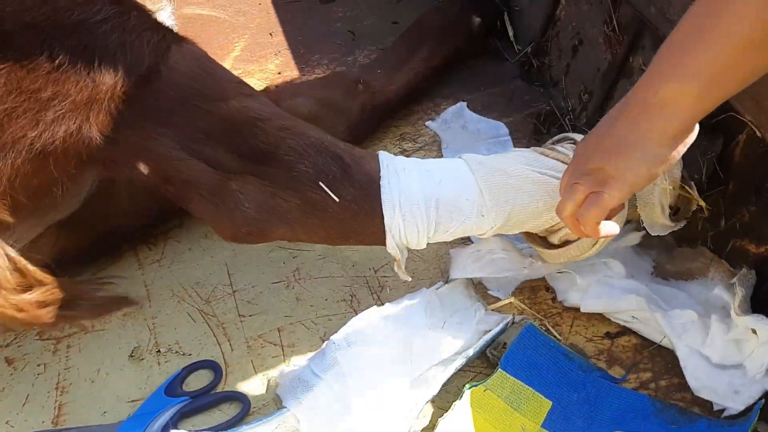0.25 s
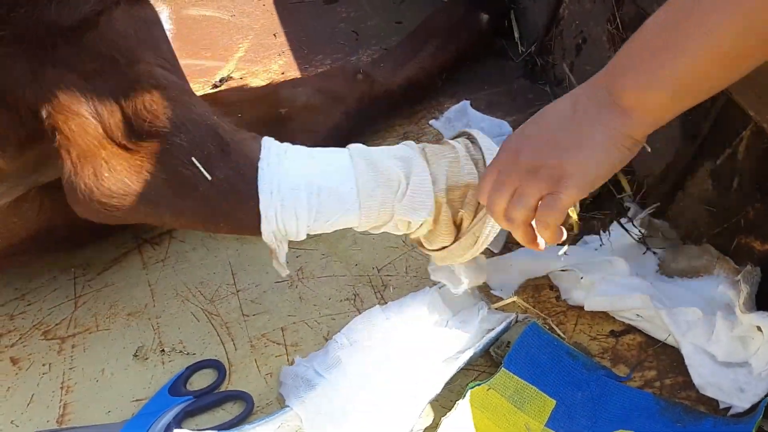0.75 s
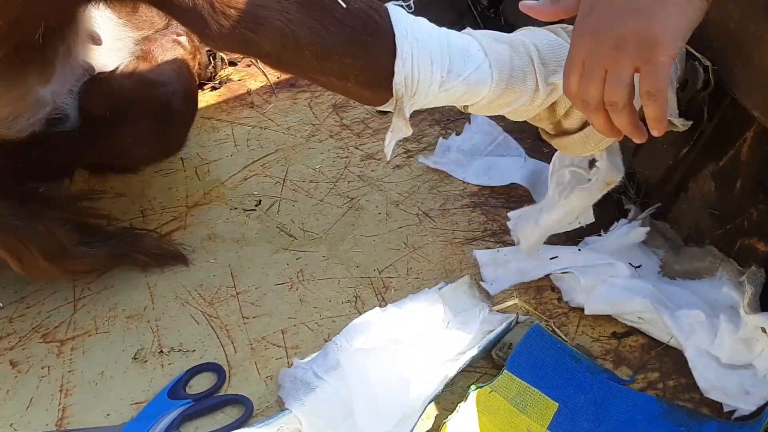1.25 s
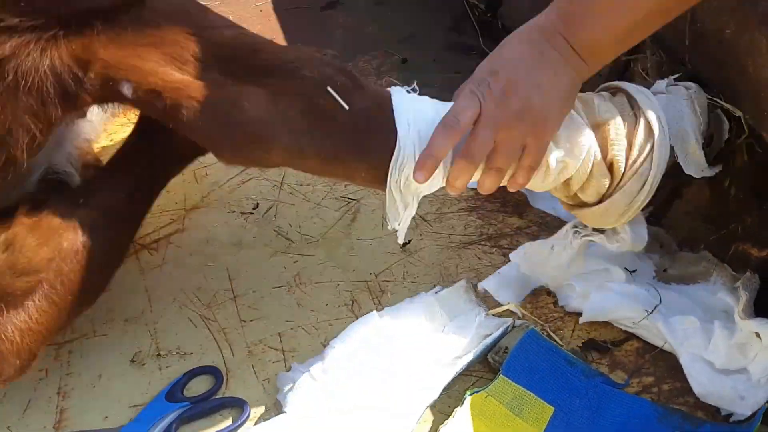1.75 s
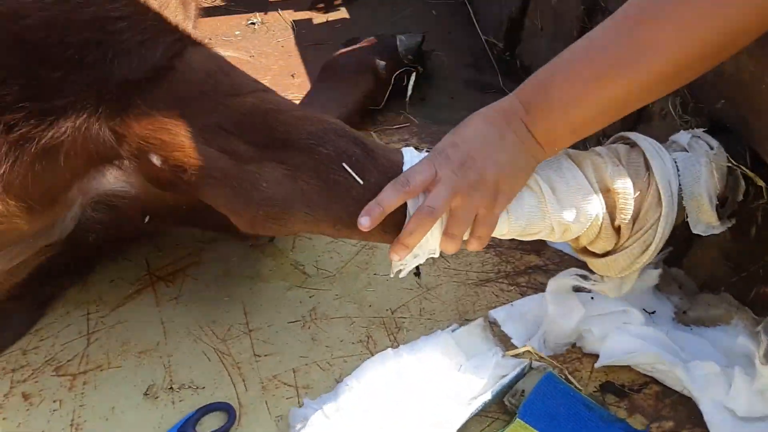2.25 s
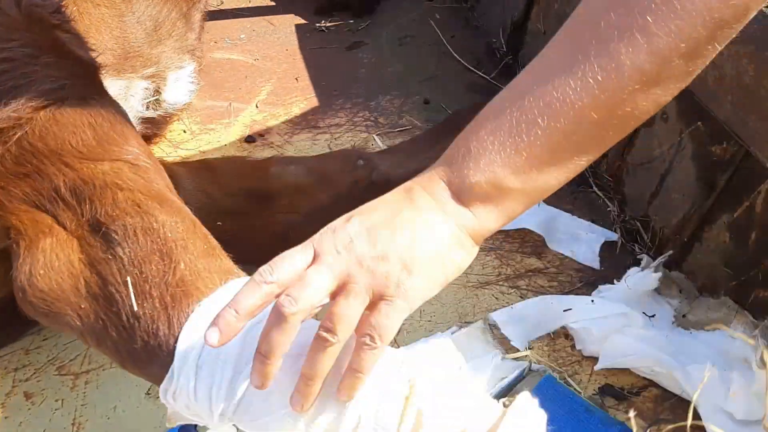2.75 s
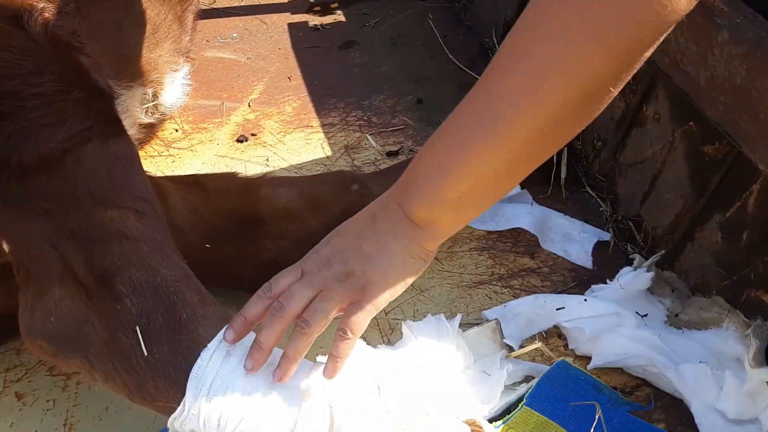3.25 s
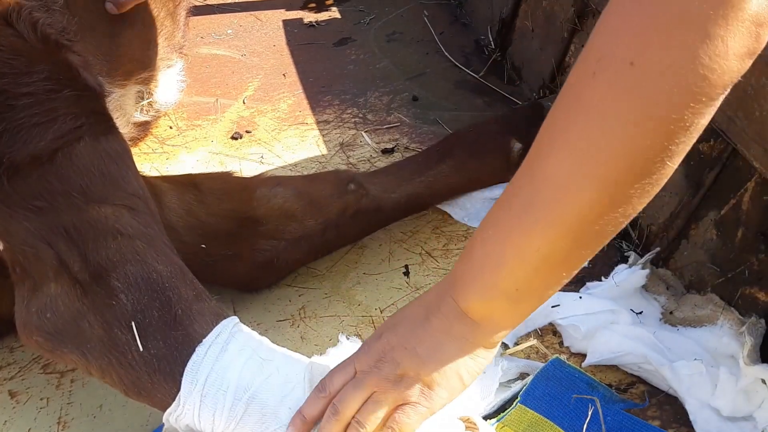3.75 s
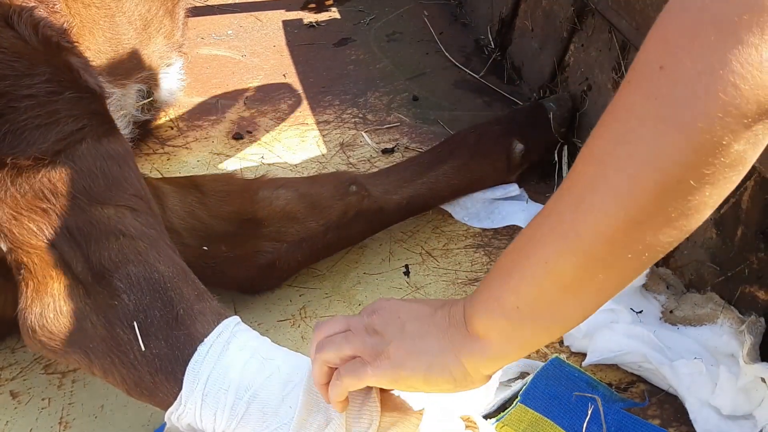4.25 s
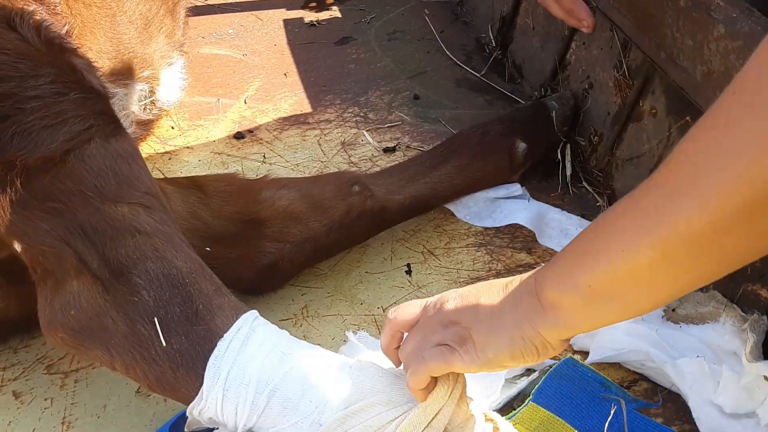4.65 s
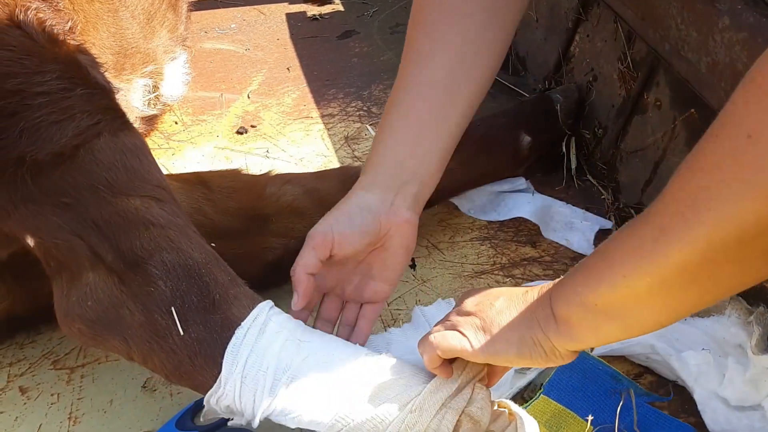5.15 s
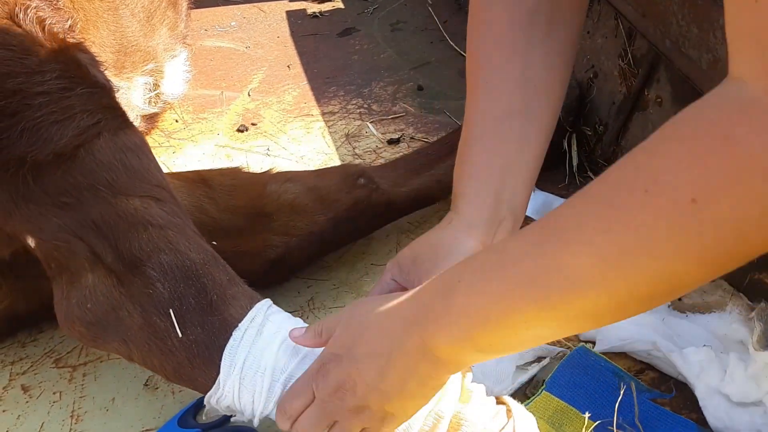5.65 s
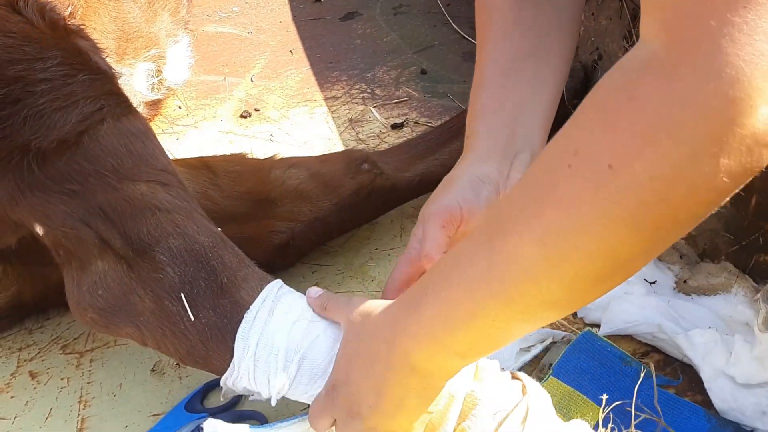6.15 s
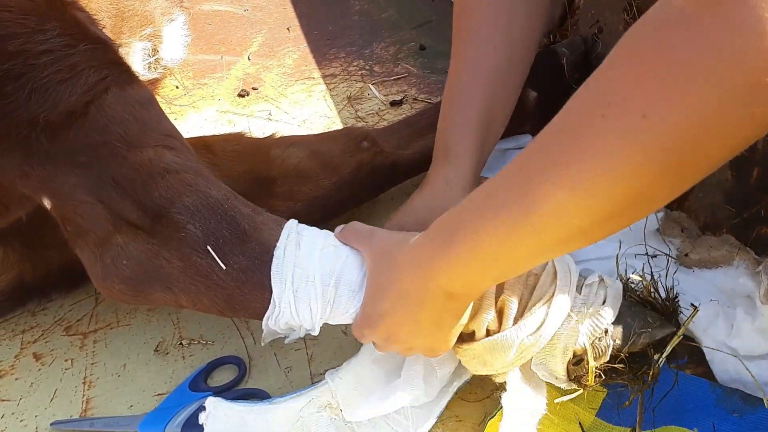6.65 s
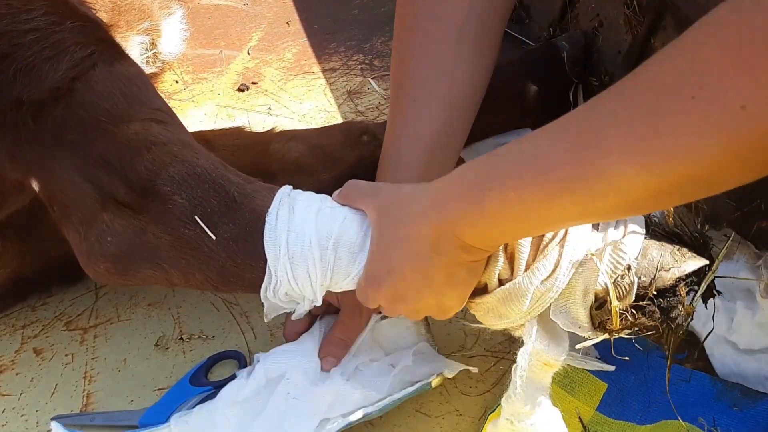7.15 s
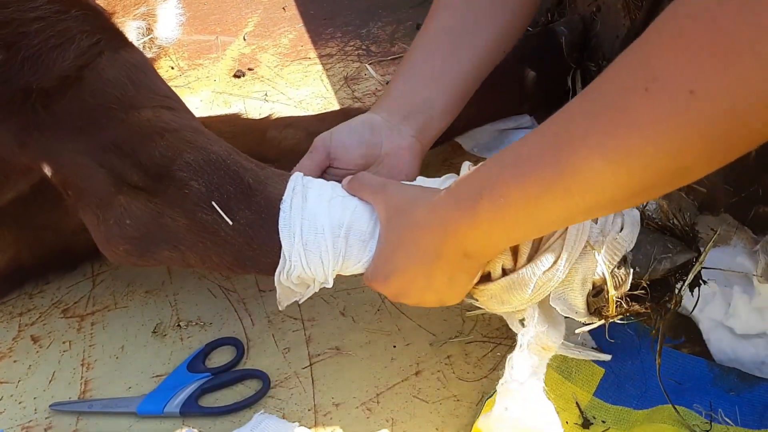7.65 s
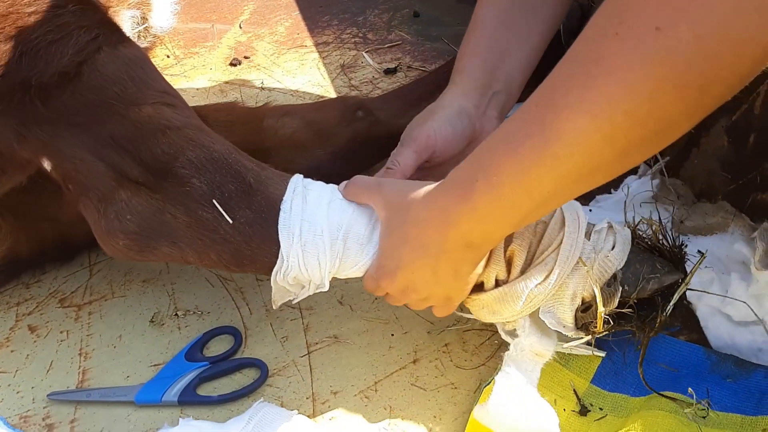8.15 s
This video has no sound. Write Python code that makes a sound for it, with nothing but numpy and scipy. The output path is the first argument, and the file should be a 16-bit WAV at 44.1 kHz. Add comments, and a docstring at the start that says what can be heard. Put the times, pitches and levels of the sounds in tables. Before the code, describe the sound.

A calf's hooves boom, clatter and scrape on a trailer floor, then faint bandage rustling, one more gritty scrape and a knock.

```python
"""Calf struggling in a trailer

A calf lies on the floor of a small trailer and kicks while its leg is bandaged. Hooves boom on the
bed, set the loose sides clattering and leave the frame humming; legs and body drag over the gritty
floor. In the lull, gauze and straw rustle over a faint hiss; then one more long scrape and a knock."""
import sys
import numpy as np
from scipy import signal
from scipy.fft import rfft, irfft, next_fast_len
from scipy.io import wavfile
from scipy.ndimage import uniform_filter1d

SR = 44100
rng = np.random.default_rng(int(sys.argv[2]) if len(sys.argv) > 2 else 0)


def output_pcm(signal):
    """Save a mono or channel-first signal as 16-bit PCM at the path in sys.argv[1].

    Samples are clipped to [-1, 1] before scaling.
    """
    pcm = np.clip(np.atleast_2d(signal).T, -1, 1) * 32767
    wavfile.write(sys.argv[1], SR, np.round(pcm).astype(np.int16))


N = 370881

# Hoof and leg blows. Each row: start in seconds, clatter of the sides in dB, boom of the bed in dB,
# hard knock in dB, rattle time in seconds, note of the spot struck in Hz.
BLOWS = [(0.233, -33.5, -33, -39.5, 0.02, 202.6), (0.285, -26.5, -28.5, -38.5, 0.018, 270),
         (0.515, -43, -51.5, -37.5, 0.038, 219), (0.611, -30.5, -41.5, -33.5, 0.044, 244.4),
         (0.726, -23.5, -11.5, -31.5, 0.033, 246.4), (0.75, -25.5, -17, -25.5, 0.077, 250.4),
         (.832, -20.5, -18, -10, 0.0085, 232.8), (0.856, -18, -14.5, -18.5, 0.0069, 190.7),
         (0.999, -16.5, -32, -37, 0.036, 223), (1.025, -18.5, -25, -34, 0.029, 219),
         (1.104, -23, -16.5, -23, 0.069, 212.4), (1.143, -24.5, -25.5, -18.5, 0.035, 232),
         (1.19, -27, -18, -23.5, 0.089, 205), (1.325, -25.5, -35, -30, 0.076, 227),
         (1.679, -29.5, -36, -42.5, 0.032, 221), (1.776, -21.5, -22, -30.5, 0.023, 191),
         (1.816, -22.5, -25, -22.5, 0.04, 227.6), (1.89, -17, -16, -19, 0.028, 185),
         (1.933, -21, -33.5, -35.5, 0.038, 226), (2, -17, -23.5, -28, 0.018, 198),
         (2.076, -17.5, -15.5, -13, 0.031, 218.6), (2.383, -21.5, -28, -38.5, 0.01, 241),
         (2.702, -36.5, -35.5, -31, 0.04, 222), (2.755, -20.5, -25, -12, 0.008, 244.5),
         (5.716, -47.5, -51.5, -48, 0.011, 249), (7.406, -33.5, -21, -19.5, 0.032, 213)]
# Modes of the floor panel. Each row: pitch in Hz, level in dB, time to fall 60 dB in seconds.
PANEL_MODES = [(162, -9.5, 0.37), (233.2, -9, 1), (271.2, -5, 0.75), (375.6, -15, 0.99),
               (441.5, -7.5, 0.31), (451, -13.5, 1), (600, -10, 0.32), (825, -17, 0.21)]
# Dense resonances of the whole trailer. Each row: frequency in Hz, spectral level in dB.
TRAILER_COLOUR = [(35, -40), (64, -25.5), (99, -3), (215, 1.5), (329, -4.5), (542, -3.5), (697, -8),
                  (1090, -15), (2260, -26), (4240, -20.5), (5440, -30), (6490, -27.5), (7730, -39),
                  (16000, -45)]
HOLLOW_HZ = 403.3, 633  # the band in which the panel sounds hollow and rings longest


def gain_of(db):
    """Decibels to amplitude."""
    return 10 ** (np.asarray(db) / 20)


def unit_rms(x):
    """Scales to rms 1."""
    return x / np.sqrt(np.mean(x ** 2) + 1e-20)


def unit_peak(x, size=600):
    """Scales each channel so that its loudest stretch of `size` samples has rms 1."""
    return x / np.sqrt(uniform_filter1d(x ** 2, size, axis=1).max(axis=1, keepdims=True) + 1e-20)


def curve_at(points, hz):
    """Reads a curve on a log-frequency axis."""
    points_hz, values = np.transpose(points)
    return np.interp(np.log(hz + 1), np.log(points_hz + 1), values)


def fader(points, power=1):
    """Gain over time from a dB curve, raised to a power; fades to silence outside it."""
    t = np.arange(N) / SR
    times, db = np.transpose(points)
    outside_s = np.maximum(times[0] - t, t - times[-1])
    return gain_of(power * np.interp(t, times, db)) * np.clip(1 - outside_s / 0.051, 0, 1)


def add(mix, start, sound):
    """Mixes in a stereo sound at a start time in seconds."""
    part = mix[:, max(round(start * SR), 0):][:, :sound.shape[1]]
    part += sound[:, :part.shape[1]]


def band(x, low_hz, high_hz, order=3):
    """Causal band-pass."""
    sections = signal.butter(order, [low_hz, min(high_hz, .49 * SR)], "band", fs=SR, output="sos")
    return signal.sosfilt(sections, x)


def wavering(size, count=N):
    """Random drift at rms 1, smoothed over `size` samples."""
    return unit_rms(uniform_filter1d(uniform_filter1d(rng.standard_normal(count), size), size))


def coloured(x, spectrum, ripple_db=0, ripple_hz=70):
    """Gives x a spectrum, at rms 1; a ripple adds chance resonances."""
    size = next_fast_len(x.shape[1], True)
    hz = np.fft.rfftfreq(size, 1 / SR)
    db = curve_at(spectrum, hz)
    if ripple_db:
        db = db + ripple_db * wavering(size=round(ripple_hz / hz[1]), count=len(hz))
    return unit_rms(irfft(rfft(x, size) * gain_of(db), size)[:, :x.shape[1]])


def grains(size, per_s, spread_db):
    """Tiny random contacts of uneven strength, in stereo."""
    strength = gain_of(spread_db * np.minimum(rng.exponential(1, size), 4))
    return unit_rms(rng.standard_normal((2, size)) * strength * (rng.random(size) < per_s / SR))


def clumps(count=N, depth_db=2.2):
    """Gain over time of contacts that catch and let go in bunches."""
    return gain_of(depth_db * wavering(size=350, count=count))


def ringing(modes, t, scatter_db):
    """Modes struck at a random spot, which changes each one's share and phase."""
    hz, db, t60 = np.transpose(modes)[:, :, None]
    swing = gain_of(db + scatter_db * rng.standard_normal(hz.shape) - 60 * t / t60)
    angle = 2 * np.pi * hz * t
    phase = rng.uniform(0, 2 * np.pi, (2, len(modes)))
    return np.cos(phase) @ (swing * np.sin(angle)) + np.sin(phase) @ (swing * np.cos(angle))


def decay(t, early_s, tail_db, t60):
    """A quick first decay, then the longer ring between the trailer's walls."""
    return np.hypot(np.exp(-t / early_s), gain_of(tail_db - 60 * t / t60))


def walls(x, early_s, tail_db, t60):
    """Dense reflections from the close walls, different in each channel."""
    t = np.arange(SR // 2) / SR
    echoes = rng.standard_normal((2, len(t))) * decay(t, early_s, tail_db, t60)
    return signal.fftconvolve(x, echoes / np.linalg.norm(echoes[0]), axes=1)[:, :x.shape[1]]


def strokes(rows, rise_s, swell_db, stop_s, tail_db, t60, column=2):
    """Gain over time of rubbing strokes: each takes hold, swells or eases, stops and rings out."""
    clock = np.arange(0, N, 64) / SR
    columns = np.transpose(rows)[:, :, None]
    t, length, db = clock - columns[0], columns[1], columns[column]
    progress = np.clip(t / length, 0, 1)
    pressure = np.clip(t / rise_s, 0, 1) * gain_of(db + swell_db * (progress - 2.5))
    envelopes = pressure * decay(np.maximum(t - length, 0), stop_s, tail_db, t60)
    return np.interp(np.arange(N) / SR, clock, np.linalg.norm(envelopes, axis=0))


def background():
    """A wavering high hiss, mostly on the right, over a very faint low wash."""
    # Colour of the hiss. Each row: frequency in Hz, spectral level in dB.
    hiss_colour = [(530, -67.5), (900, -23), (2850, -20.5), (3900, -6), (5610, -14.5), (6480, -13),
                   (7400, -26.5), (16000, -28)]
    # Its slow swell. Each row: time in seconds, level in dB.
    swell = [(3.4, -68.5), (8.2, -63.5)]
    level_db = np.interp(np.arange(N) / SR, *np.transpose(swell)) + wavering(size=2000)
    hiss = gain_of([[-3.9], [1.8]]) * coloured(rng.standard_normal((2, N)), hiss_colour)
    wash = unit_rms(band(rng.standard_normal((2, N)), 110, 150, order=1))
    return gain_of(level_db) * hiss + gain_of(-66) * wash


def shoves(layer, tail_db, t60):
    """Gain over time of one layer of a leg shoved over the floor."""
    # Each row: start and length in seconds, then bed rumble, panel groan and grit in dB.
    scuffs = [(-.02, 0.12, -39, -46, -55.5), (.14, 0.29, -43, -50, -50.5), (.46, 0.27, -42.5, -52.5, -60.5),
              (.66, 0.36, -39, -43.5, -48.5), (.87, .2, -29.5, -29, -39.5), (1.42, 0.14, -51, -48.5, -53),
              (1.565, 0.028, -45, -39, -40), (1.71, 0.27, -39, -33.5, -42.5), (2.02, 0.19, -34.5, -28, -34),
              (2.2, 0.29, -39.5, -41.5, -44.5), (2.5, 0.5, -44, -43, -49.5)]
    column = {"rumble": 2, "panel": 3, "grit": 4}[layer]
    return strokes(scuffs, rise_s=0.023, swell_db=-1, stop_s=0.04, tail_db=tail_db, t60=t60,
                   column=column)


def rubbed_bed(per_s, modes_db):
    """Stick-slip jerks keep the floor panel sounding."""
    slips = grains(N, per_s, spread_db=3.2)
    ring = ringing(PANEL_MODES, np.arange(SR // 4) / SR, scatter_db=-1)
    panel = signal.fftconvolve(slips, ring, axes=1)[:, :N]
    dense = coloured(walls(slips, early_s=0.047, tail_db=-9, t60=0.81), TRAILER_COLOUR)
    return dense + gain_of(modes_db) * unit_rms(panel)


def dragging():
    """The body rumbles on the bed; sliding legs make the panel groan and scuff the grit."""
    rumble = unit_rms(band(rubbed_bed(per_s=300, modes_db=-19.5), 90, 290, order=2))
    panel = unit_rms(band(rubbed_bed(per_s=500, modes_db=-6.5), *HOLLOW_HZ, order=2))
    grit = walls(grains(N, per_s=2500, spread_db=0.81), early_s=0.0017, tail_db=-24, t60=0.74)
    scuff = unit_rms(band(coloured(grit, TRAILER_COLOUR), 760, 5900, order=2))
    struggle = (shoves("rumble", tail_db=-8, t60=1.5) * rumble
                + shoves("panel", tail_db=-11.5, t60=1.9) * panel
                + shoves("grit", tail_db=1, t60=0.8) * scuff)
    return struggle + hoof_slide(rumble, panel, scuff)


def rustle():
    """Fibres rub in a clumpy crackle: coat brushes gauze, and every shove stirs the straw."""
    # Brushes gather speed until they slip off. Each row: start and length in seconds, level in dB.
    brushes = [(.01, 0.49, -52), (.29, 0.13, -41), (.87, .04, -30.5), (1.07, 0.093, -35.5),
               (1.44, 0.17, -40), (1.79, 0.071, -35), (2.13, 0.14, -37.5), (2.48, 0.29, -45.5),
               (2.84, 0.41, -59.5)]
    fibres = grains(N, per_s=9000, spread_db=2) * clumps()
    brushing = strokes(brushes, rise_s=0.053, swell_db=10.5, stop_s=0.015, tail_db=-9.5, t60=0.3)
    stirring = gain_of(-26) * shoves("grit", tail_db=-6, t60=0.94)
    return gain_of(10.5) * np.hypot(brushing, stirring) * unit_rms(band(fibres, 5500, 13300, order=1))


def steel(t):
    """The short ring of the loose steel parts."""
    # Each row: pitch in Hz, level in dB.
    fittings = [(1287, -10), (2094, -6), (3268, 2), (3490, 4), (4130, -7)]
    return unit_peak(ringing([(hz, db, .15) for hz, db in fittings], t, scatter_db=3.5))


def clatter(t, db, rattle_s):
    """The loose sides bounce in bunches before they settle; a gentle blow is duller."""
    settling = np.exp(-(t / max(rattle_s, .008)) ** 3)
    bounces = grains(len(t), per_s=1500, spread_db=2) * clumps(len(t)) * settling
    chatter = walls(coloured(bounces, TRAILER_COLOUR, ripple_db=3), early_s=0.004, tail_db=-13, t60=0.34)
    chatter = unit_peak(band(chatter, 1250, 15000))
    planks = ringing([(hz, 0, .1) for hz in rng.uniform(1100, 5000, size=24)], t, scatter_db=9)
    sound = chatter + gain_of(-17.5) * steel(t) + gain_of(-13.5) * unit_peak(planks)
    cutoff_hz = min(29330 * gain_of(db) ** 0.54, .49 * SR)
    return gain_of(db) * signal.lfilter(*signal.butter(1, cutoff_hz, fs=SR), sound)


def blow(clatter_db, boom_db, knock_db, rattle_s, spot_hz):
    """A leg's weight booms the bed, the hard hoof knocks it, and the sides clatter."""
    t = np.arange(SR) / SR
    window = 1250  # samples, long enough to level low notes
    dense = coloured(rng.standard_normal((2, SR)), TRAILER_COLOUR)
    modes = unit_peak(ringing(PANEL_MODES, t, scatter_db=4), window)
    # the panel gives two short hollow notes; a stiff spot rings higher and has less depth
    low_note, high_note = (unit_peak(ringing([(hz, 0, .26)], t, scatter_db=0), window)
                           for hz in (spot_hz, 2.29 * spot_hz))
    low_cut_hz = np.clip(100 * (spot_hz / 220) ** 3, 85, 170)
    boom = dense * decay(t, early_s=0.07, tail_db=-5.5, t60=0.91) + gain_of(-5) * modes + low_note
    rise = np.minimum(t / 0.0059, 1)  # the heavy bed takes a moment to get going
    boom = unit_peak(band(boom, low_cut_hz, 400) * rise, window)
    # the top of a knock is damped at once; only its hollow middle lingers
    lingering = band(dense, *HOLLOW_HZ, order=2) * gain_of(-11 - 60 * t / 0.89)
    knock = dense * np.exp(-t / 0.054) + lingering + gain_of(-8.5) * modes + gain_of(-7.5) * high_note
    knock = unit_peak(band(knock, 390, 950), window)
    sound = gain_of(boom_db) * boom + gain_of(knock_db - 2) * knock + clatter(t, clatter_db, rattle_s)
    return sound * np.minimum(t / .002, 1) * np.minimum((1 - t) / 0.18, 1)


def kicks():
    """The calf hits the trailer: hard blows, soft bumps and a clank of steel."""
    # Knee and flank on the bed. Each row: start in seconds, level in dB, pitch in Hz.
    bumps = [(.373, -31, 273.4), (0.647, -31, 234), (1.583, -34.5, 246.4), (2.956, -33.5, 185.5),
             (4.025, -48, 228), (4.463, -47, 237), (6.279, -52, 144), (6.619, -50.5, 141.4),
             (6.858, -33, 139), (6.953, -37, 153), (7.327, -26, 230.6), (7.417, -23, 135)]
    # A jolt throws the steel parts against the frame. Each row: start in seconds, level in dB.
    clanks = [(1.001, -18)]
    out = np.zeros((2, N))
    for start, *settings in BLOWS:
        add(out, start, blow(*settings))
    for start, db, spot_hz in bumps:
        add(out, start, bump(db, spot_hz))
    for start, db in clanks:
        add(out, start, gain_of(db) * steel(np.arange(SR // 2) / SR))
    return out


def stored_vibration(t60):
    """Amplitude of a vibration that every boom feeds and that dies away slowly."""
    energy_in = np.zeros(N)
    for start, _, boom_db, *_ in BLOWS:
        energy_in[round(start * SR)] += gain_of(boom_db) ** 2
    kept_per_sample = gain_of(-60 / (t60 * SR)) ** 2
    return np.sqrt(signal.lfilter([1], [1, -kept_per_sample], energy_in))


def frame_hum():
    """The frame stores energy from every boom: a low wash lingers and two tones sing on for seconds."""
    # Each row: pitch in Hz, relative level in dB.
    frame_tones = [(158, -76), (217.6, -63.5)]
    t = np.arange(N) / SR
    tones = sum(gain_of(db + 28) * np.sin(2 * np.pi * hz * t) for hz, db in frame_tones)
    wash = gain_of(-23) * unit_rms(band(rng.standard_normal((2, N)), 130, 290, order=2))
    return stored_vibration(t60=8.66) * tones + stored_vibration(t60=3) * wash


def bump(db, spot_hz):
    """Flesh meets the panel slowly, so only its low ring sounds."""
    t = np.arange(SR // 2) / SR
    dense = unit_rms(band(rng.standard_normal((2, len(t))), 85, 360))
    thud = gain_of(-5) * dense + np.sin(2 * np.pi * spot_hz * t)
    envelope = np.minimum(t / 0.014, 1) * decay(t, early_s=.045, tail_db=-20, t60=.8)
    return gain_of(db) * unit_peak(thud * envelope, size=700)


def cracks_and_snaps():
    """Sharp cracks: hard hoof edges crack during the kicks, and later stalks snap under hoof and hand; louder
    ones last longer."""
    # Each row: start in seconds, level in dB.
    snaps = [(0.647, -31), (0.832, -25), (1.777, -24.5), (1.938, -22.5), (2, -22.5), (2.078, -26.5),
             (4.008, -50.5), (4.223, -52), (6.097, -57), (6.2687, -48.5)]
    out = np.zeros((2, N))
    t = np.arange(SR // 4) / SR
    for start, db in snaps:
        breaking = decay(t, early_s=0.092 * gain_of(db / 2), tail_db=-19, t60=0.15)
        snap = band(rng.standard_normal((2, len(t))) * breaking, 3200, 10000, order=1)
        add(out, start, gain_of(db - 5) * unit_peak(snap * np.minimum(t / .003, 1), size=90))
    return out


def groans(waver_hz=9):
    """A sliding hoof or stalk sticks and slips on one unsteady note, which swells and rings out."""
    # Each row: start and length in seconds, level in dB, pitch in Hz.
    notes = [(0.747, 0.2, -29, 545), (1.69, 0.13, -31.5, 555), (2.1, 0.043, -25, 555),
             (6.865, 0.093, -33.5, 500), (7.199, 0.057, -24, 458), (7.32, 0.039, -23.5, 525)]
    out = np.zeros(N)
    for start, length, db, hz in notes:
        cycles = np.cumsum(hz + waver_hz * wavering(size=300)) / SR
        bow = strokes([(start, length, db)], rise_s=0.03, swell_db=1, stop_s=0.018, tail_db=-22, t60=.4)
        out += bow * np.sin(2 * np.pi * cycles)
    return out * np.array([[1], [0]])  # only in the channel that feeds both microphones


def bandage():
    """Cloth slides softly over cloth and rubs the leg against the panel."""
    # Pulls round the leg. Each row: start and length in seconds, cloth rasp and panel rub in dB.
    tugs = [(4.334, 0.072, -59.5, -69), (4.42, 0.25, -66, -62.5), (5.1, 0.07, -60.5, -62.5),
            (5.88, 0.1, -67.5, -72.5), (6.09, 0.2, -62.5, -69.5)]
    catching = np.sqrt(clumps())
    threads = coloured(grains(N, per_s=7000, spread_db=0), TRAILER_COLOUR)
    rasp = unit_rms(catching * band(threads, 2830, 22000, order=2))
    rub = unit_rms(band(rubbed_bed(per_s=900, modes_db=-1.5), 235, 2200, order=2))
    pull = dict(rise_s=.013, swell_db=-2, stop_s=0.033)  # a pull slackens, then stops
    return (strokes(tugs, **pull, tail_db=-20, t60=0.3, column=2) * rasp
            + strokes(tugs, **pull, tail_db=-30, t60=0.8, column=3) * rub)


def hoof_slide(rumble, panel, scuff):
    """One long scrape crunches the grit; panel and bed swell more gently than the crunch."""
    # The slide is louder the faster it goes. Each row: time in seconds, grit level in dB.
    slide = [(6.875, -46), (6.982, -52.5), (7.13, -44), (7.165, -36), (7.21, -41), (7.34, -39),
             (7.39, -49.5)]
    # Colour of hoof on grit. Each row: frequency in Hz, spectral level in dB.
    grit_colour = [(900, -6), (1590, -8.5), (2790, -24.5), (4920, -14), (5680, -26), (6410, -19),
                   (7960, -35), (9420, -31), (16000, -46)]
    catching = clumps()
    grit = walls(grains(N, per_s=1700, spread_db=3.9), early_s=0.0034, tail_db=3, t60=0.21)
    crunch = unit_rms(catching * band(coloured(grit, grit_colour), 500, 18000))
    hollow = unit_rms(band(panel, 310, 660, order=1))
    return (fader(slide) * (gain_of(3) * crunch + gain_of(-2.5) * scuff)
            + gain_of(-18) * fader(slide, power=0.44) * hollow
            + gain_of(-31.5) * fader(slide, power=0.13) * rumble)


def microphones(x):
    """Two microphones share the bass but hear the treble apart."""
    # How alike they sound. Each row: frequency in Hz, likeness from 0 to 1.
    likeness = [(200, .99), (600, .85), (1200, .25), (2500, .08)]
    # The right one is keener in the presence range. Each row: frequency in Hz, left minus right in dB.
    balance = [(700, -2), (1800, -4.5), (3500, -11), (6000, -9.5), (8000, 0.5)]
    size = next_fast_len(N, True)
    hz = np.fft.rfftfreq(size, 1 / SR)
    shared, separate = rfft(x, size)
    alike = np.clip(curve_at(likeness, hz), 0, 1)
    left_gain = gain_of(curve_at(balance, hz))
    pair = np.array([left_gain * shared, alike * shared + np.sqrt(1 - alike ** 2) * separate])
    centre_gain = np.sqrt(1 + left_gain ** 2 + 2 * left_gain * alike) / 2
    return irfft(pair / centre_gain, size)[:, :N]


def scene():
    """Everything in the trailer, heard from just above the calf."""
    struggle = kicks() + frame_hum() + dragging() + groans()
    return microphones(struggle + bandage() + rustle() + cracks_and_snaps() + background())


def record(dry):
    """Peaks round off near full scale, and a steep low-pass trims the very top."""
    rounded = dry / (1 + dry ** 8) ** (1 / 8)
    low_pass = signal.firwin(511, 15950, window=("kaiser", 9), fs=SR)
    return signal.oaconvolve(rounded, low_pass[None], "same")


dry = scene()
out = record(dry)
output_pcm(out)
```